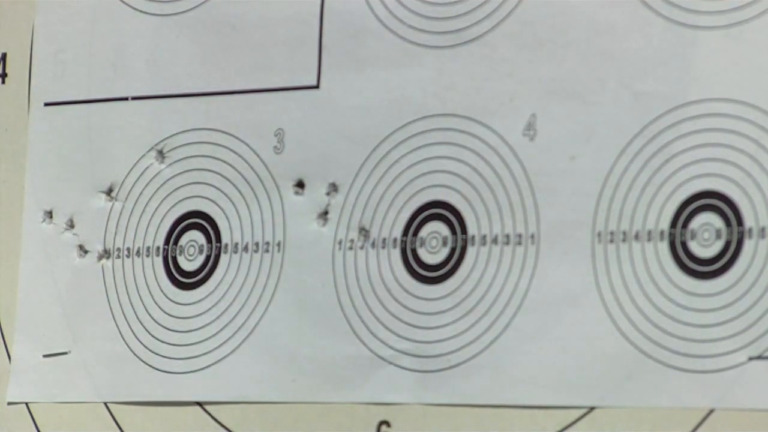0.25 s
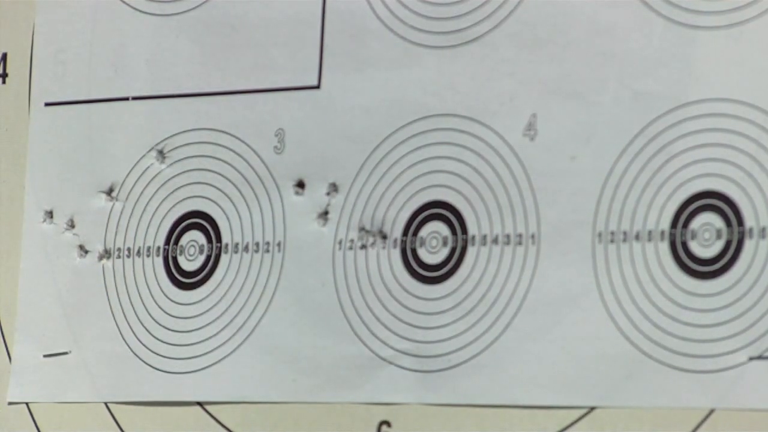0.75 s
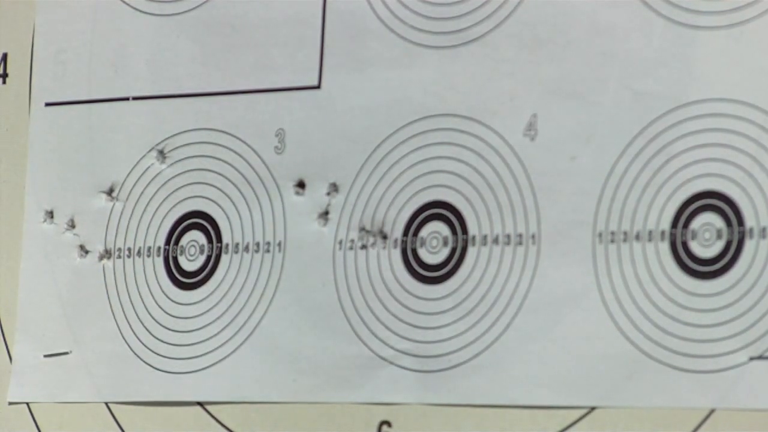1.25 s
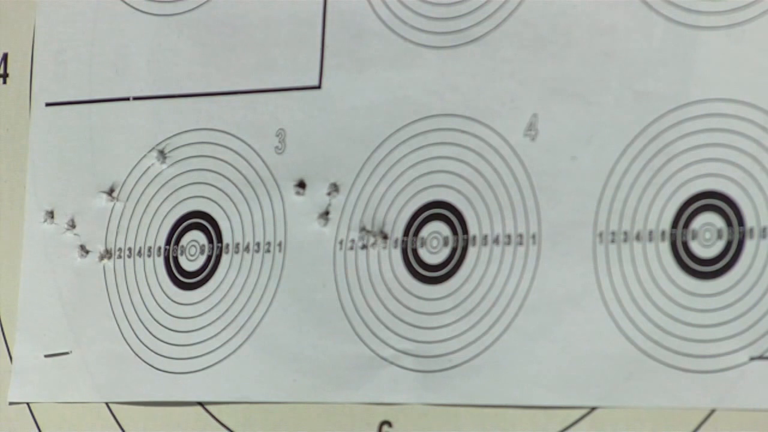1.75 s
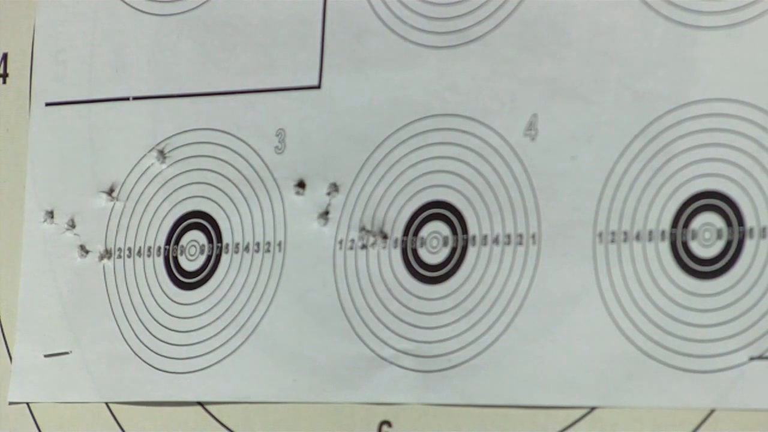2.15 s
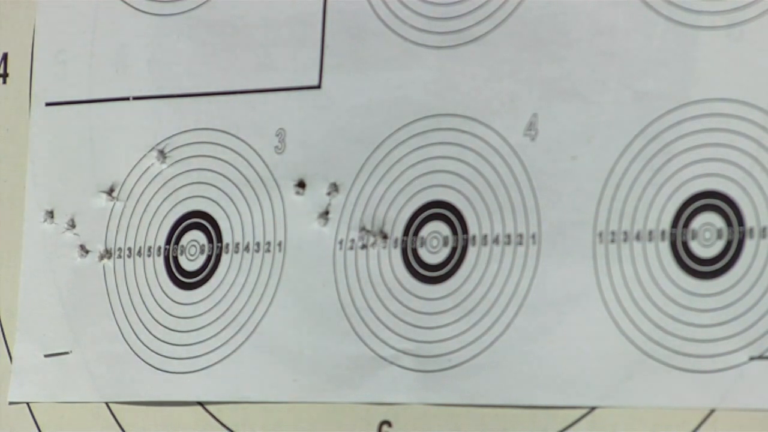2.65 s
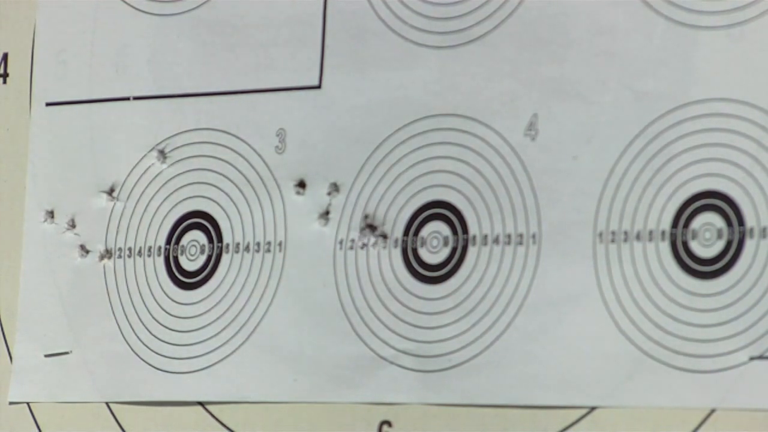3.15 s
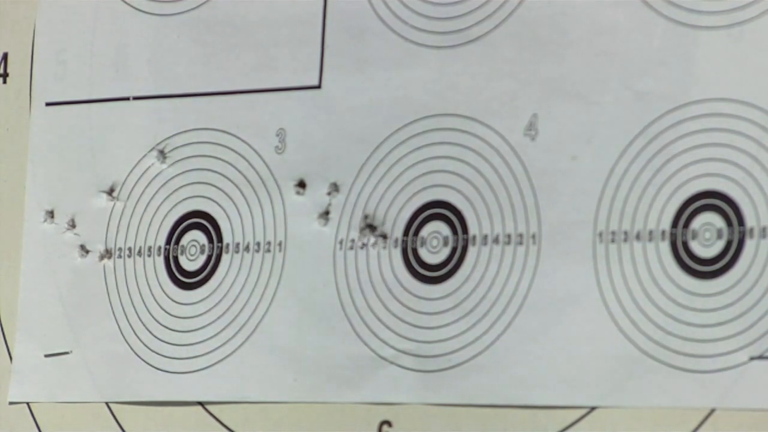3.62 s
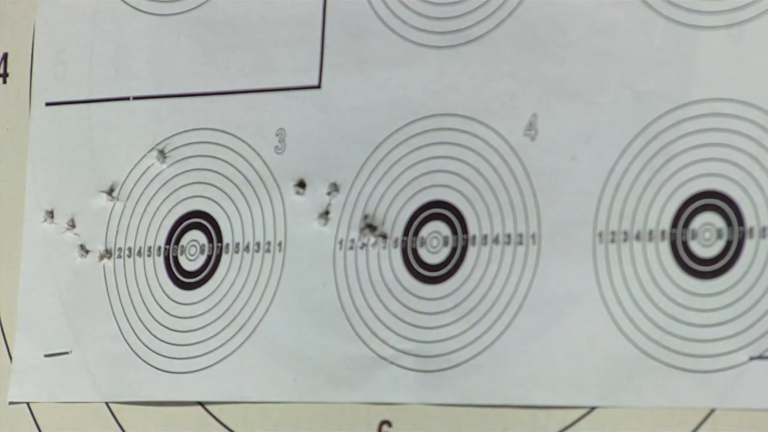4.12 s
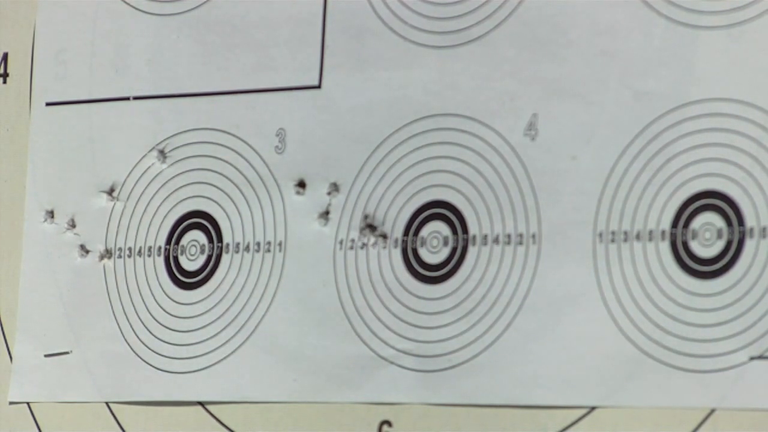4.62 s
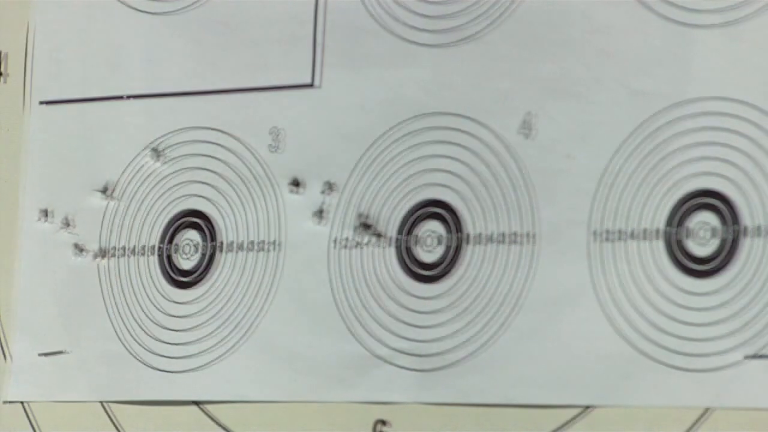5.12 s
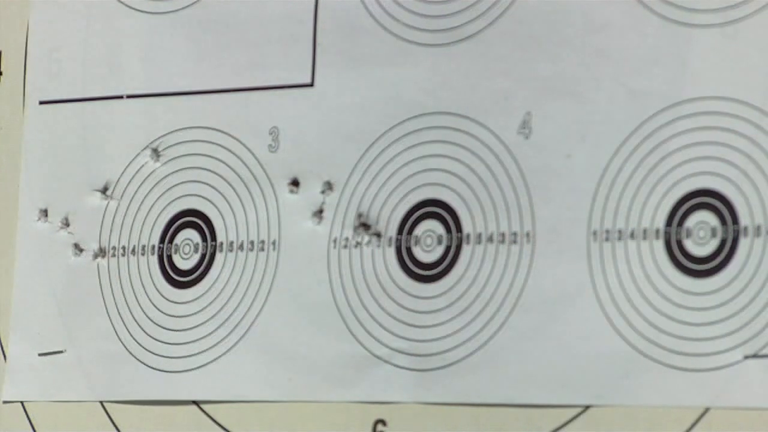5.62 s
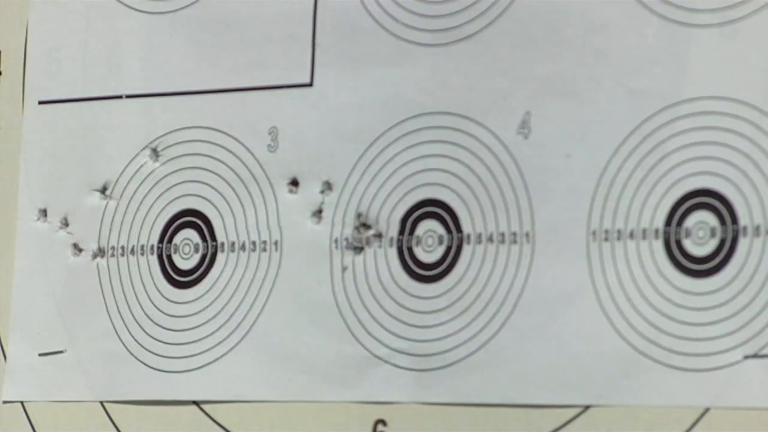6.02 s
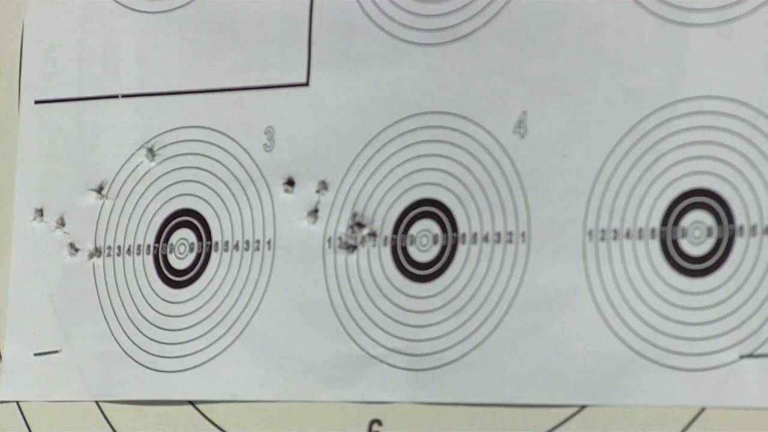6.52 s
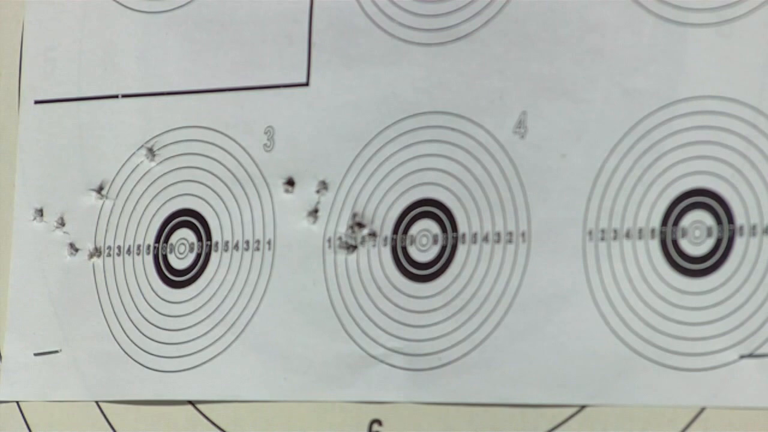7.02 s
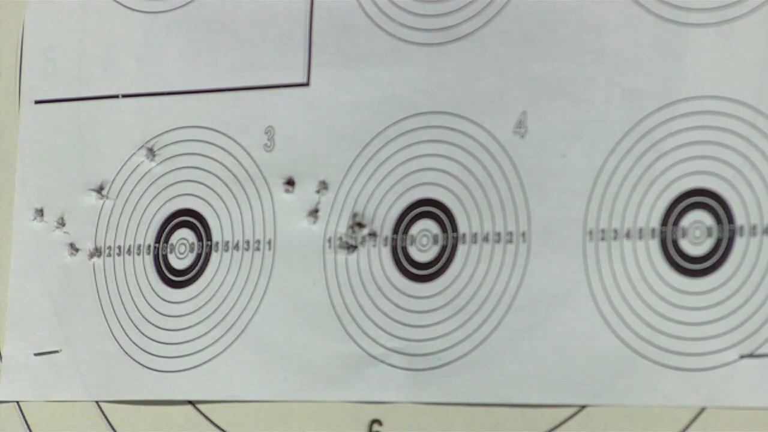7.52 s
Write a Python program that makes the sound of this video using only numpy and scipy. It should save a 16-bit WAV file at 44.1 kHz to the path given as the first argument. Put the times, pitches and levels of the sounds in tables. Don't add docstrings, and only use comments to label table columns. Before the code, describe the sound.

A dry, very loud air rifle pop and an equally sharp board hit arrive as a tight double crack, three times over, each trailing clumpy yard echoes. Between them, wind thumps softly on the close microphone, quiet birds chirp and whistle far away, and faint electronic hiss and thin whine persist. Soft clicks mark abrupt background changes; a distant vehicle drones faintly before the final shot, followed by dull handling knocks.

```python
import sys
import numpy as np
from scipy import signal
from scipy.fft import rfft, irfft, next_fast_len
from scipy.io import wavfile
from scipy.ndimage import uniform_filter1d, map_coordinates

SR = 44100
rng = np.random.default_rng(int(sys.argv[2]) if len(sys.argv) > 2 else 0)


def master_out(mix):
    frames = np.transpose(np.atleast_2d(mix))
    ceiling = np.clip(frames, -1, 1)
    pcm = np.round(ceiling * 32767).astype(np.int16)
    wavfile.write(sys.argv[1], SR, pcm)


def convert_level_to_amplitude(level_db):
    exponent = np.asarray(level_db, float) / 20
    return 10 ** exponent


N = 342657

# freq_hz, level_db (per Hz)
SCATTER_COLOUR = [(100, -48.5), (250, -16), (600, -7), (1100, -7.5), (1600, -2), (2100, -7.5), (2800, 1.5),
                  (3600, -5), (4400, -13.5), (5500, -25.5), (7000, -36.5), (12000, -48), (20000, -120)]


def unit(x):
    return x / np.sqrt(np.mean(x ** 2) + 1e-20)


def along(points, hz):
    f, v = np.transpose(points)
    return np.interp(np.log(hz + 1), np.log(f + 1), v)


def noise(spectrum, size=N):
    m = next_fast_len(size + 8192)
    shape = convert_level_to_amplitude(along(spectrum, np.fft.rfftfreq(m, 1 / SR)))
    return unit(irfft(rfft(rng.standard_normal(m)) * shape, m)[:size])


def wobble(rate):
    knots = rng.standard_normal(int(N * rate / SR) + 4)
    return map_coordinates(knots, [np.arange(N) * rate / SR])


def bump(s, spread):
    return np.exp(-.5 * ((np.arange(N) / SR - s) / spread) ** 2)


def add(track, s, sound):
    part = track[round(s * SR):][:len(sound)]
    part += sound[:len(part)]


def rifle():
    # pop_s, opening_hz, pop_t60_s
    shots = [
        (.38935, 1250, .0019),
        (2.98785, 1500, .0024),
        (6.02795, 1600, .003),
    ]
    # delay_s, level_db, opening_lift_hz, ring_stretch (factor), rise_ms
    paths = [(-.0030, -39, 400, 1.5, .3), (-.0012, -30, 400, 1.2, .3), (0, 0, 0, 1, .08),
             (.0046, -16, 300, 1.1, .5), (.0085, 0, 600, 1.25, .08), (.0131, -18, 900, 1.8, .5),
             (.0166, -17, 200, 1, .3), (.0214, -29, 500, 1.3, .4), (.0234, -28, 500, 1.3, .4),
             (.040, -33, 600, 2, .5), (.048, -33, 600, 2, .5), (.253, -45, 600, 3, 1)]
    # start_s, level_db, board_hz
    smacks = [
        (.4721, 10, 3550),
        (3.0695, 9, 3500),
        (6.1129, 10, 3650),
    ]
    # start_s, level_db, knock_hz
    taps = [
        (1.509, -45, 2800),
        (5.983, -58, 2500),
        (6.631, -39, 900),
        (6.8315, -38, 1000),
        (6.995, -53, 3500),
    ]
    # freq_hz, level_db (per Hz)
    stock_colour = [(150, -40), (350, -3), (900, 0), (1800, -7), (3800, -3), (5000, -20), (6200, -17),
                    (9500, -24), (13000, -40)]
    pop_db = 12
    out = np.zeros(N)
    for (pop_s, open_hz, t60), (hit_s, hit_db, board_hz) in zip(shots, smacks):
        for delay, path_db, lift_hz, stretch, rise_ms in paths:
            arrival = pop(open_hz + lift_hz, t60 * stretch, rise_ms / 1000)
            add(out, pop_s + delay, convert_level_to_amplitude(pop_db + path_db) * arrival)
        add(out, hit_s, convert_level_to_amplitude(hit_db) * smack(board_hz))
        add(out, hit_s - 1 / 10, whizz())
        add(out, pop_s, yard())
    t = np.arange(SR // 30) / SR
    for s, db, hz in taps:
        wood = noise(stock_colour, size=len(t)) + .7 * np.sin(2 * np.pi * hz * t)
        add(out, s, convert_level_to_amplitude(db - 60 * t / .022) * wood * (1 - np.exp(-t / .0007)))
    return out


def pop(open_hz, t60, rise):
    t = np.arange(SR // 20) / SR
    final_hz, glide_s = 3050, .00065
    hz = final_hz + (open_hz - final_hz) * np.exp(-t / glide_s)
    rough = 1 + .25 * uniform_filter1d(rng.standard_normal(len(t)), size=30)
    ring = -np.sin(2 * np.pi * np.cumsum(hz * rough) / SR)
    decay = convert_level_to_amplitude(-60 * (t / t60) ** 1.2) + convert_level_to_amplitude(-22 - 60 * t / .016)
    life = decay * (1 - np.exp(-(t / rise) ** 2))
    push = convert_level_to_amplitude(-24.5) * np.sin(2 * np.pi * 120 * t - .6)
    push *= convert_level_to_amplitude(-60 * t / 0.022) * (1 - np.exp(-t / 0.00029))
    suck = -convert_level_to_amplitude(-9.5 - 60 * t / 0.0018) * (1 - np.exp(-t / .0001))
    scatter = convert_level_to_amplitude(-27 - 60 * t / 0.035) * noise(SCATTER_COLOUR, size=len(t))
    return ring * life / life.max() + push + suck + scatter


def smack(board_hz):
    # mode_hz, level_db, t60_s
    modes = [
        (1680, -9, .01),
        (2850, -12.5, .02),
        (420, -19.5, .012),
        (800, -15.5, .008),
        (1200, -15.5, .008),
        (2250, -17.5, .008),
        (5600, -22, .004),
        (11000, -24, 0.0077),
    ]
    t = np.arange(SR // 8) / SR
    sag = 1 + .06 - 80 * t
    ring = np.sin(2 * np.pi * board_hz * np.cumsum(sag) / SR) * convert_level_to_amplitude(-60 * (t / .0038) ** 1.8)
    for hz, db, t60 in modes:
        level = convert_level_to_amplitude(db + rng.normal(0, 2) - 60 * t / t60)
        ring += level * np.sin(2 * np.pi * hz * rng.normal(1, .02) * t)
    tear = convert_level_to_amplitude(-23 - 60 * t / .01) * rng.standard_normal(len(t))
    rattle = convert_level_to_amplitude(-21.0 - 60 * t / 0.05) * noise(SCATTER_COLOUR, size=len(t))
    direct = (ring + tear) * (1 - np.exp(-t / .00005))
    out = direct + rattle
    for delay, db in [(.0053, -18), (.0074, -19)]:
        add(out, delay, convert_level_to_amplitude(db) * direct * (1 - np.exp(-t / 0.00016)))
    return out


def whizz():
    # freq_hz, level_db (per Hz)
    hiss_colour = [(3000, -64.5), (7000, -12), (9500, -3.5), (13000, -0.5), (16000, -7), (20000, -28.5)]
    t = np.arange(-SR // 10, SR // 5) / SR
    swell = np.where(t < 0, convert_level_to_amplitude(-46 + 450 * t), convert_level_to_amplitude(-43 - 60 * t / .18))
    return swell * noise(hiss_colour, size=len(t))


def yard():
    # level_db, t60_s
    layers = [
        (-29.5, .5),
        (-41.5, 2.2),
        (-48.5, 4),
    ]
    # freq_hz, change_db_per_s
    dulling = [(500, 5), (1600, 1.5), (3000, -7), (4500, -9), (7000, -35.5)]
    # delay_s, spread_s, swell_db
    walls = [
        (.045, .02, 0.5),
        (.135, .012, 5.5),
        (.2, .015, 1),
        (.255, .012, 3.5),
        (.43, 0.019, 1.5),
        (.56, 0.015, 1),
    ]
    hz, t, z = signal.stft(noise(SCATTER_COLOUR, size=2 * SR), SR, nperseg=256)
    clumps = uniform_filter1d(rng.standard_normal(z.shape), size=12, axis=0)
    clumps = 1.6 * unit(uniform_filter1d(clumps, size=2, axis=1))
    colour_db = along(dulling, hz)[:, None] * (t - 0.3677) + clumps
    tail = signal.istft(z * convert_level_to_amplitude(colour_db), SR, nperseg=256)[1]
    age = np.arange(len(tail)) / SR
    decay = np.sqrt(sum(convert_level_to_amplitude(db - 60 * age / t60) ** 2 for db, t60 in layers))
    swell_db = sum(db * bump(s, spread) for s, spread, db in walls)
    swell_db += -8 * bump(.112, 0.0068)
    return tail * decay * convert_level_to_amplitude(swell_db[:len(tail)])


def scene_changes():
    # start_s, level_db, sign (factor)
    jumps = [
        (1.7913, -33.5, 0.9),
        (1.8172, -26.5, -1),
        (2.432, -31.5, 0.98),
        (5.3655, -31, 0.98),
        (7.5503, -31, -1),
        (7.5596, -41, 0.96),
        (7.5688, -30.5, 0.99),
        (7.7695, -37, 0.19),
    ]
    leak = np.exp(-np.arange(SR // 10) / SR / 0.011)
    out = np.zeros(N)
    for s, db, sign in jumps:
        add(out, s, sign * convert_level_to_amplitude(db) * leak)
    return out


def wind():
    # time_s, strength_db, small_over_large_db
    breeze = [(0, -43, -17), (.2, -50.5, -14), (.6, -43, -18), (.98, -46, -21), (1.05, -34, -17),
              (1.42, -41.5, -16), (1.5, -31, -8), (2.1, -33, -15), (2.42, -30, -2.5), (2.52, -39.5, -13),
              (2.95, -36, -13), (3.5, -37.5, -11.5), (3.9, -41.5, -18), (4.5, -36.5, -11.5),
              (5.35, -41.5, -5.5), (5.45, -48.5, -15.5), (7.45, -52, -11.5), (7.77, -37.5, -16)]
    # centre_s, spread_s, level_db, small_over_large_db
    gusts = [(0.652, .02, -40.5, -10.5), (.92, 0.028, -44, -20.5), (1.041, .025, -30, -23),
             (1.15, 0.029, -33.5, -15), (1.331, 0.014, -34.5, -21.5), (1.561, 0.034, -25, -12.5),
             (1.7, 0.023, -24.5, -12), (1.901, 0.042, -26.5, -2.5), (2.019, 0.04, -24, -5.5),
             (2.2, 0.044, -23, -6), (2.33, 0.027, -31.5, 3.5), (2.6, 0.031, -36.5, -19),
             (2.83, .04, -44, -8), (3.2, 0.022, -28.5, -5.5), (3.32, 0.018, -38, -0.5),
             (3.422, 0.042, -33, -9), (3.8, 0.032, -37.5, -7.5), (4.08, 0.028, -34.5, -12.5),
             (4.3, 0.028, -34, -20.5), (4.449, 0.059, -33, -5.5), (5.09, 0.018, -36, -4),
             (5.19, 0.044, -35.5, -11), (5.3, 0.037, -38, -1.5), (5.5, 0.034, -45, -14.5),
             (5.75, 0.044, -47, -15.5), (6.419, .05, -47, -18), (6.67, .02, -45, -9.5),
             (7.099, .04, -41.5, -20.5), (7.6, 0.029, -26, -13)]
    # centre_s, level_db, eddy_hz, sign (factor)
    lumps = [
        (1.993, -4.5, 85.5, 0.82),
        (2.158, -13.5, 63.7, 1),
        (2.193, -11.5, 70, -1.1),
        (2.231, -15, 39.5, 0.89),
        (2.277, -13.5, 81, 0.91),
        (7.594, -14, 34.9, -1.1),
    ]
    s, strength_db, small_db = np.transpose(breeze)
    now = np.arange(N) / SR
    heave = convert_level_to_amplitude(np.interp(now, s, strength_db))
    buffet = convert_level_to_amplitude(np.interp(now, s, strength_db + small_db))
    for at, spread, db, gust_small_db in gusts:
        heave += convert_level_to_amplitude(db) * bump(at, spread)
        buffet += convert_level_to_amplitude(db + gust_small_db) * bump(at, spread)
    flutter = convert_level_to_amplitude(-16.5 - 40) * (buffet * 100) ** 1.1
    # (Hz, dB per Hz)
    sizes = [(heave, 1.6, [(4, -60), (10, 0), (25, -1), (55, -10), (90, -29), (300, -120)]),
             (buffet, 3.2, [(25, -90.5), (55, 4.5), (130, -11.0), (200, -30), (600, -120)]),
             (flutter, 5, [(60, -89.5), (125, 2.0), (250, -7.5), (450, -29.0), (1200, -120)])]
    gusting = wobble(22)
    out = np.zeros(N)
    for level, depth_db, colour in sizes:
        out += level * unit(convert_level_to_amplitude(depth_db * gusting) * noise(colour))
    t = np.arange(-4000, 4000) / SR
    for at, db, hz, sign in lumps:
        u = np.sqrt((t * 2 * np.pi * hz) ** 2 + 0.34)
        add(out, at + t[0], sign * convert_level_to_amplitude(db + 4.0) * (1 - u * 0.5) * np.exp(-u))
    return out


def birds():
    # start_s, from_hz, held_hz, level_db
    chirps = [
        (1.222, 2500, 4320, -57),
        (1.57, 2400, 4250, -54),
    ]
    # start_s, length_s, from_hz, held_hz, level_db
    whistles = [(1.83, .18, 3590, 3670, -70), (2.28, .21, 3560, 3670, -69), (2.28, .3, 1820, 1460, -70),
                (2.65, .1, 4400, 4470, -73), (2.68, .3, 2030, 2125, -72), (2.73, .26, 3540, 3655, -69),
                (2.81, .2, 3000, 2380, -61), (2.81, .19, 3150, 2580, -63), (2.82, .18, 3150, 2850, -68),
                (4.22, .28, 3180, 3285, -66), (4.4, .5, 3290, 3290, -81), (5.0, .1, 3800, 3880, -68),
                (5.68, .08, 2370, 2440, -74), (5.87, .06, 3740, 3780, -71), (6.57, .1, 3600, 3690, -59),
                (7.0, .12, 3500, 3670, -61), (7.12, .18, 3670, 3680, -70)]
    out = np.zeros(N)
    waver = 1 + .005 * wobble(120)

    def sing(s, hz):
        unsteady_hz = hz * waver[round(s * SR):][:len(hz)]
        return np.sin(2 * np.pi * np.cumsum(unsteady_hz) / SR)

    t = np.arange(SR // 4) / SR
    slur_s, hold_s, t60_s = .038, .012, .1
    for s, from_hz, held_hz, db in chirps:
        up = np.clip(t / slur_s, 0, 1)
        hz = from_hz + (held_hz - from_hz) * np.sin(up * np.pi / 2) ** 1.3
        level_db = -10 * (1 - up) - 60 * np.clip(t - slur_s - hold_s, 0, 1) / t60_s
        after = convert_level_to_amplitude(-19 - 60 * t / 1.1) * (up == 1)
        add(out, s, convert_level_to_amplitude(db) * (convert_level_to_amplitude(level_db) + after) * np.minimum(t * 100, 1) * sing(s, hz))
    for s, length, from_hz, held_hz, db in whistles:
        u = np.arange(round(length * SR)) / SR / length
        swell = np.abs(np.sin(np.pi * u ** .7))
        settle = .17 if held_hz > from_hz else .4
        hz = held_hz + (from_hz - held_hz) * np.exp(-u / settle)
        add(out, s, convert_level_to_amplitude(db) * swell * sing(s, hz))
    out *= convert_level_to_amplitude(1.1 * wobble(54))
    smear = rng.standard_normal(len(t)) * convert_level_to_amplitude(-60 * t / .45)
    return out + convert_level_to_amplitude(-4.5) * signal.fftconvolve(out, smear / np.linalg.norm(smear))[:N]


def traffic():
    # freq_hz, level_db (per Hz)
    drone_colour = [(90, -60.5), (150, -0.5), (220, -2.5), (330, -25), (600, -90.5)]
    return convert_level_to_amplitude(-61.5) * bump(5.6, .5) * noise(drone_colour)


def floor():
    # start_s, hiss_db, whine_db
    scenes = [
        (0, 0.5, 1.5),
        (1.791, 6, -15),
        (1.817, 3.5, 5.5),
        (2.432, 0.5, 1.5),
        (4.761, 4, -6),
        (5.366, 0.5, 1),
        (7.552, 3, 1.5),
    ]
    # tone_hz, wander_hz, level_db
    whine = [
        (7865, 6, -86),
        (11970, 6, -77),
    ]
    # freq_hz, level_db (per Hz)
    hum_colour = [(60, -92.5), (130, -4), (200, -1), (300, -8), (550, -8), (800, -17), (1500, -24),
                  (3000, -24.5), (5000, -35.5), (9000, -90)]
    hiss_colour = [(100, -41), (600, -1), (2500, -1.5), (6000, -4), (11000, -5), (15000, -5.5),
                   (17000, -15)]
    side_colour = [(18, -29.5), (30, 0), (141, -23), (179, -18.5), (1760, -28.5), (2750, -27.5),
                   (12000, -26), (16000, -40.5)]
    s, hiss_db, whine_db = np.transpose(scenes)
    current = np.searchsorted(s, np.arange(N) / SR, "right") - 1
    swell_db = 1.3 * wobble(5)
    mid = convert_level_to_amplitude(-63.0 + swell_db) * noise(hum_colour)
    mid += convert_level_to_amplitude(-69.5 + hiss_db[current]) * noise(hiss_colour)
    for hz, wander_hz, tone_db in whine:
        flicker_db = .8 * wobble(30)
        drift = np.cumsum(hz + wander_hz * wobble(60)) / SR
        mid += convert_level_to_amplitude(tone_db + whine_db[current] + 2.5 + flicker_db) * np.sin(2 * np.pi * drift)
    side = convert_level_to_amplitude(-73.5 + hiss_db[current]) * noise(side_colour)
    return np.array([mid + side, mid - side])


def scene():
    return rifle() + scene_changes() + wind() + birds() + traffic() + floor()


def band_limit(x):
    return signal.sosfilt(signal.butter(12, 16530, fs=SR, output="sos"), x)


def record(dry):
    clipped = dry / (1 + np.abs(dry / convert_level_to_amplitude(-.3)) ** 8) ** (1 / 8)
    skew = np.gradient(np.gradient(np.gradient(clipped.mean(0))))
    pair = clipped + convert_level_to_amplitude(-14) * np.array([skew, -skew])
    limit = signal.butter(12, 16200, fs=SR, output="sos")
    return band_limit(signal.sosfiltfilt(limit, pair))


dry = scene()
out = record(dry)
master_out(out)
```